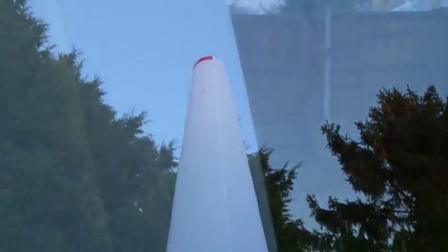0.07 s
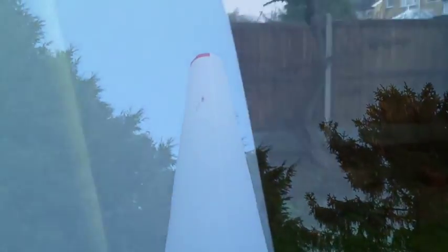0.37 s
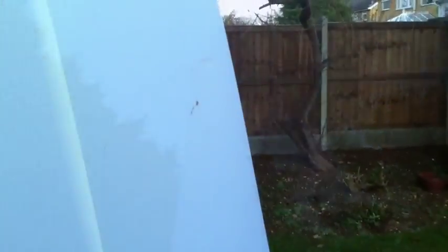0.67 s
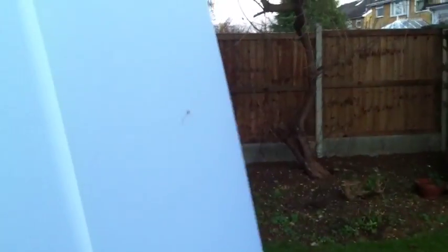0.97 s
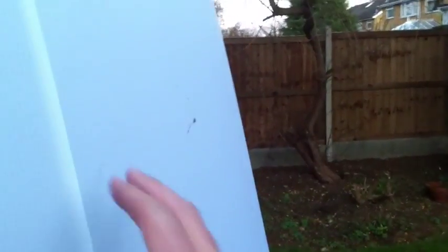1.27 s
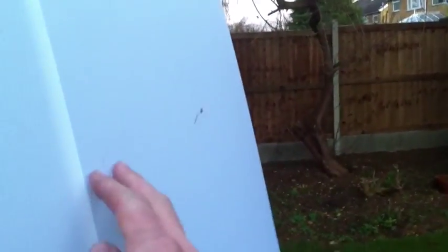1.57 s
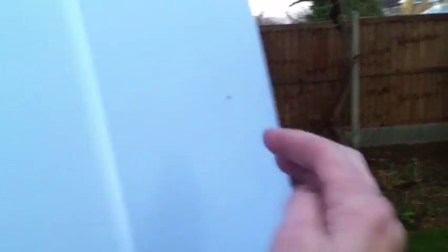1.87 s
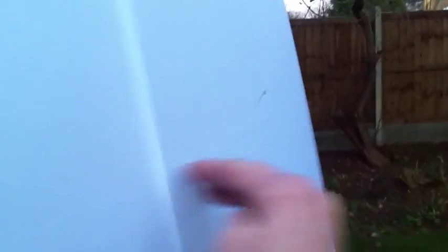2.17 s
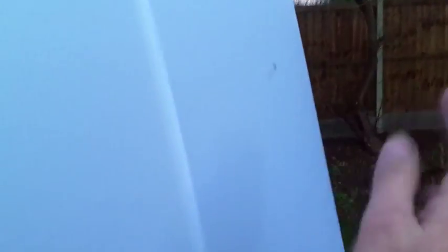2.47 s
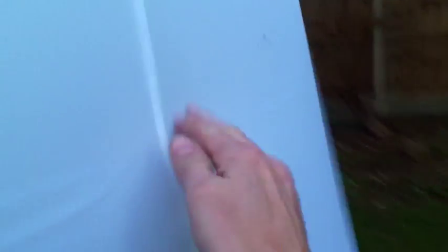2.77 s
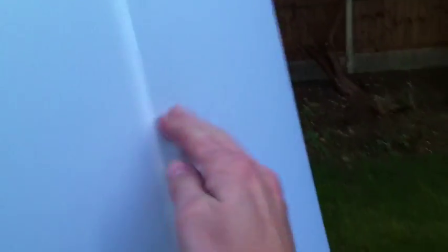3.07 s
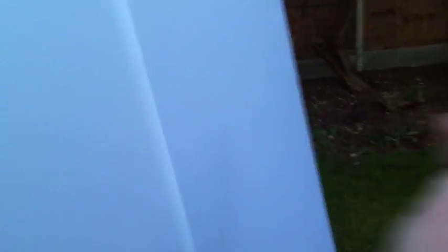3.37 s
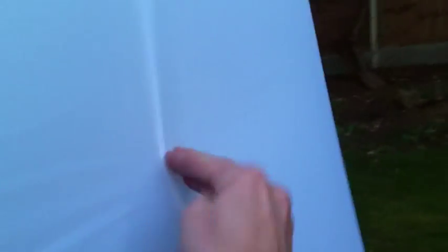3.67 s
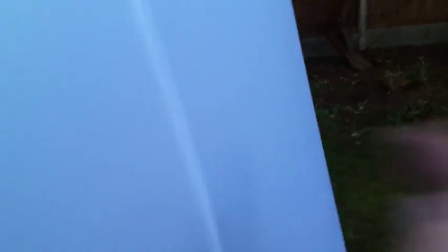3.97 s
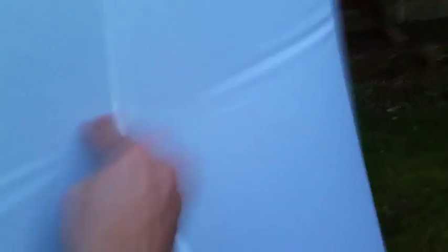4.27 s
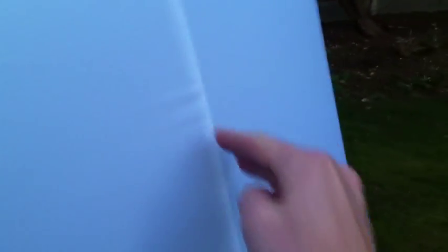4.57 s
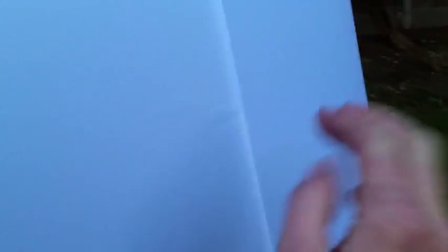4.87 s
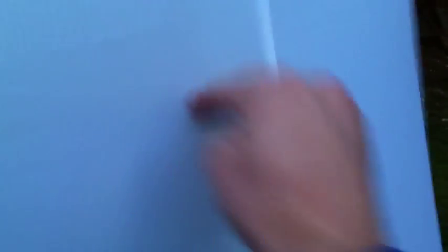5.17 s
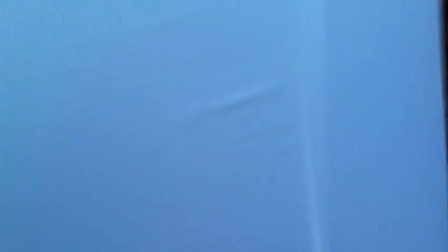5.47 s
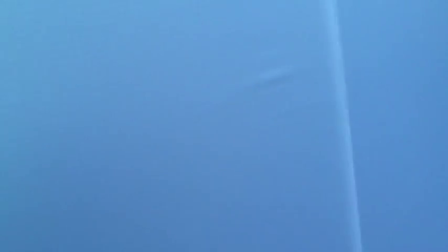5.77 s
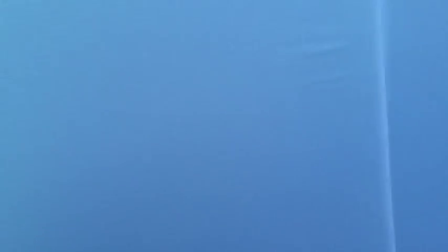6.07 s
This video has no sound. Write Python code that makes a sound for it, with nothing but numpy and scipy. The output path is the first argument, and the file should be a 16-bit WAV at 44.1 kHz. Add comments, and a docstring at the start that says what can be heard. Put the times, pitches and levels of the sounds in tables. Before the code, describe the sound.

An air blower hums quietly and evenly in a garden. After about two seconds, a hand starts slapping the tight fabric of an inflatable close by: five crisp, drum-like thumps at a regular pace, the first a little softer, each with a short reverberation. Brief rubs, tiny finger squeaks and light sleeve rustles fill the gaps. A couple of faint ticks follow the last slap while the blower carries on.

```python
"""A far rush fades in the first half second, leaving the drone of a blower in a fenced garden.
A hand then slaps the taut nylon wall of an inflatable five times, close by. Each slap is a thump of the
air-backed skin, a crack and the ring of air pockets under the hand; the wall wobbles and the garden
reverberates. Between slaps the hand slides, squeaks and peels off, and a sleeve swishes with the arm."""
import sys
import numpy as np
from scipy import signal
from scipy.fft import rfft
from scipy.io import wavfile

SR = 44100
rng = np.random.default_rng(int(sys.argv[2]) if len(sys.argv) > 2 else 0)


def pcm_store(signal):
    """Save signal as 16-bit PCM."""
    levels = np.round(np.clip(np.atleast_2d(signal), -1, 1) * 32767)
    wavfile.write(sys.argv[1], SR, levels.astype(np.int16).T)


N = 278271
TIME = np.arange(N) / SR


def amp(db):
    """Decibels to amplitude ratio."""
    return 10 ** (np.asarray(db) / 20)


def unit(x):
    """Normalisation to rms 1."""
    return x / np.sqrt(np.mean(x ** 2) + 1e-20)


def curve_at(points, hz):
    """Interpolation on a logarithmic frequency axis."""
    point_hz, value = np.transpose(points)
    return np.interp(np.log(hz + 1), np.log(point_hz), value)


def decay(t, t60):
    """Exponential damping: 60 dB in t60 seconds."""
    return np.exp(-np.log(1000) * t / t60)


def ring(t, hz, t60):
    """Free vibration of a damped resonator."""
    return np.sin(2 * np.pi * hz * t) * decay(t, t60)


def add(mix, start_s, sound):
    """Superposition: the sound joins the mix at start_s."""
    part = mix[round(start_s * SR):][:len(sound)]
    part += sound[:len(part)]


def noise(gain, size=N):
    """Spectral shaping: white noise weighted by gain(Hz), at rms 1."""
    spectrum = rfft(rng.standard_normal(size)) * gain(np.fft.rfftfreq(size, 1 / SR))
    return unit(np.fft.irfft(spectrum, size))


def slow_noise(cutoff_hz, size):
    """Low-pass noise with a Gaussian roll-off, at rms 1."""
    return noise(lambda hz: np.exp(-(hz / cutoff_hz) ** 2), size)


def drift(rate_hz):
    """Random modulation of mean 0 and rms 1, mostly slower than rate_hz."""
    return noise(lambda hz: np.exp(-(hz / rate_hz) ** 2) * (hz > 0))


# The spectrum of the far rush. Each row: frequency in Hz, relative level in dB.
RUSH_SPECTRUM = [(100, -17), (300, -28), (480, 0), (640, 5), (820, -3), (1300, -11), (2200, -8.5),
                 (2800, -21), (4000, -12.5), (4700, -31), (10000, -23.5), (16000, -35)]


def far_rush(level_db=-42.5, fade_s=0.43):
    """Broadband noise, perhaps from a road, dies away under a Gaussian envelope."""
    rush = noise(lambda hz: amp(curve_at(RUSH_SPECTRUM, hz)))
    return amp(level_db) * rush * np.exp(-(TIME / fade_s) ** 2)


# The spectrum of the fan's turbulence. Each row: frequency in Hz, relative level in dB.
TURBULENCE_SPECTRUM = [(20, -12), (55, -25), (100, -14), (170, -2), (260, 4), (440, 0), (540, -2),
                       (900, -4.5), (1250, -7), (1650, -13), (2500, -13), (3500, -18.5), (8000, -23),
                       (15500, -36)]
# The resonances of the blower's housing. Each row: centre in Hz, width in Hz, steady rms level in dB.
HOUSING_MODES = [(333.7, 45, -45), (717, 10, -67.5), (1188, 76, -62), (1403, 9.1, -64.5), (2109, 62, -62.5),
                 (4080, 170, -69), (6200, 130, -72.5)]


def blower(roar_db=-46.0, blade_hz=706.6, blade_db=-52.0, waver=0.0017):
    """Turbulence roars, the housing resonates in narrow bands, and blade passage gives a wavering tone."""
    turbulence = noise(lambda hz: amp(curve_at(TURBULENCE_SPECTRUM, hz)))
    roar = amp(roar_db + .5 * drift(7.9)) * turbulence
    drone = sum(amp(db) * noise(lambda hz: 1 / (1 + ((hz - centre) / (0.64 * width)) ** 2))
                for centre, width, db in HOUSING_MODES)
    blade_gain = amp(blade_db + drift(5.9))
    blade_phase = 2 * np.pi * np.cumsum(blade_hz * (1 + waver * drift(9.6))) / SR
    opening_swell = np.interp(TIME, [0, .25], [.5, 1])
    return roar + blade_gain * np.sin(blade_phase) + drone * opening_swell


# The garden's damping. Each row: frequency in Hz, time to decay by 60 dB in seconds.
GARDEN_DECAY = [(100, 1.76), (300, 0.8), (1000, 0.7), (3000, 0.2), (6000, 2), (14000, 4)]
# The colour of its reverberation. Each row: frequency in Hz, relative level in dB.
GARDEN_SPECTRUM = [(80, -8), (200, -15.5), (300, -3), (450, -7), (1000, 0), (2200, -4.5), (3500, -18),
                   (7000, -21), (15000, -16)]


def garden(sound, first_s=.012, fence_s=0.038, fence_db=-21, early_db=6, echoes_per_s=5000):
    """Reflection: early scatter from near walls, a tail from trees and houses, one echo off the fence."""
    t = np.arange(SR // 2) / SR
    scatter = rng.choice([-1., 1.], len(t)) * (rng.random(len(t)) < echoes_per_s / SR)
    hz, frame_s, bands = signal.stft(unit(scatter), SR, nperseg=256)
    t60 = curve_at(GARDEN_DECAY, hz)[:, None]
    colour = amp(curve_at(GARDEN_SPECTRUM, hz))[:, None]
    energy_scale = np.sqrt(2 * np.log(1000) / (t60 * SR))  # longer decays start lower
    bands = bands * decay(frame_s, t60) * colour * energy_scale
    tail = signal.istft(bands, SR, nperseg=256)[1][:len(t)]
    early_boost = amp(early_db * np.exp(-(t / 0.053) ** 2))
    response = tail * (1 - decay(t, 0.0029)) * early_boost
    fence_echo = signal.lfilter(*signal.butter(1, [400, 3000], "band", fs=SR), sound)
    out = np.zeros(N)
    add(out, first_s, signal.fftconvolve(sound, response)[:N])
    add(out, fence_s, amp(fence_db) * fence_echo)
    return out


# The spectrum of rubbing cloth. Each row: frequency in Hz, relative level in dB.
CLOTH_SPECTRUM = [(300, -15), (1500, -4), (4000, -2), (8000, -2.5), (12000, -2), (16000, -9)]
# Arm movements without a blow. Each row: moment of greatest speed in seconds, sleeve level in dB.
ARM_REACHES = [(1.3, -52.5), (3.06, -54), (3.92, -55.5), (5.58, -49.5), (6.02, -55.5)]


def sleeve(rest_db=-62.5, gather_db_per_s=70, settle_db_per_s=34.5, lead_s=0.036):
    """Friction noise of cloth on cloth grows with the arm's speed, which peaks just before each blow."""
    swings = [(start - lead_s, sleeve_db) for start, *_, sleeve_db, _ in BLOWS]
    power = amp(rest_db) ** 2
    for fastest_s, db in swings + ARM_REACHES:
        drop_db = np.maximum(gather_db_per_s * (fastest_s - TIME), settle_db_per_s * (TIME - fastest_s))
        power = power + amp(db - drop_db) ** 2
    cloth = noise(lambda hz: amp(curve_at(CLOTH_SPECTRUM, hz)))
    grain = amp(1.2 * drift(55) + 2.26 * drift(900))
    return cloth * np.sqrt(power) * grain


# Fingers slipping on nylon. Each row: start and length in seconds, first and last pitch in Hz,
# level in dB.
FINGER_SLIPS = [(2.715, 0.0076, 1420, 750, -32), (2.843, 0.019, 1290, 1750, -49),
                (4.338, 0.0078, 1160, 705, -29), (4.491, 0.014, 1446, 710, -37.5),
                (5.317, .022, 3620, 1980, -61), (5.352, .022, 1685, 2140, -43)]


def squeaks(jitter=0.13, overtone_db=-9):
    """Stick-slip oscillation: uneven slips whose rate glides with the finger's speed."""
    out = np.zeros(N)
    for start, length, first_hz, last_hz, db in FINGER_SLIPS:
        glide_hz = np.geomspace(first_hz, last_hz, round(length * SR))
        slip_hz = glide_hz * (1 + jitter * slow_noise(900, len(glide_hz)))
        phase = 2 * np.pi * np.cumsum(slip_hz) / SR
        tone = np.sin(phase) + amp(overtone_db) * np.sin(2 * phase)
        add(out, start, amp(db) * unit(tone * signal.windows.cosine(len(tone))))
    return out


def stroke(length, peak_hz, catch_db=1.3, catch_hz=450, octaves=1.73, swell_share=0.24):
    """Sliding friction: skin catches on threads, and the grainy hiss follows the hand's pressure."""
    size = round(length * SR)
    pressure = np.interp(np.linspace(0, 1, size), [0, swell_share, 1], [0, 1, 0])
    hiss = noise(lambda hz: (1 + (np.log2((hz + 1) / peak_hz) / octaves) ** 2) ** -1.2, size)
    catches = amp(catch_db * slow_noise(catch_hz, size))
    return unit(hiss * catches * pressure)


# Strokes over the weave. Each row: start and length in seconds, level in dB, spectral peak in Hz.
HAND_STROKES = [(2.151, 0.042, -50, 8000), (2.849, 0.046, -36.5, 3740), (2.931, 0.17, -47.5, 8000),
                (3.845, 0.092, -50.5, 8000), (4.348, 0.021, -30, 5100), (4.48, 0.043, -48, 1750),
                (4.511, 0.052, -46, 3250), (4.593, .021, -48.5, 9000), (5.177, 0.097, -44.5, 6030),
                (5.242, 0.029, -37.5, 7400), (5.322, 0.035, -40, 3300), (5.36, .029, -43, 2960)]


def slides(skid_lag_s=.012, skid_s=0.048, hiss_db=-10.5):
    """Friction, dull in grip and bright in glide: the hand skids after each blow and strokes the wall."""
    out = np.zeros(N)
    for start, *_, skid_db in BLOWS:
        rub = stroke(skid_s, peak_hz=980, catch_db=4, catch_hz=220)
        hiss = amp(hiss_db) * stroke(skid_s, peak_hz=6500)
        add(out, start + skid_lag_s, amp(skid_db) * (rub + hiss))
    for start, length, db, peak_hz in HAND_STROKES:
        add(out, start, amp(db) * stroke(length, peak_hz))
    return out


# Fingers landing or letting go, and fabric ticks. Each row: start in seconds, level before filtering
# in dB, pitch in Hz, time to decay by 60 dB in seconds.
LIGHT_CONTACTS = [(1.3342, -30, 2800, .004), (1.4342, -31, 3000, .003), (2.0935, -24, 3500, .004),
                  (2.7178, -21, 1400, .008), (2.854, -23, 1700, .01), (3.5708, -16, 2100, .01),
                  (4.3565, -14, 3000, .005), (4.3575, -17, 380, .02), (4.5225, -26, 1400, .007),
                  (5.5190, -27, 2600, .002), (6.1658, -19.5, 2100, .002)]


def taps(grit_share=0.46, band_hz=(300, 4800), palm_lag_s=0.0051, palm_db=-12.5, palm_hz=1400):
    """Small impacts ring briefly with a little grit, too small to radiate bass and softened by skin."""
    out, t = np.zeros(N), np.arange(SR // 20) / SR
    # the palm lands just behind the fingers, at a level relative to the thump
    palms = [(start + palm_lag_s, thump_db + palm_db, palm_hz, .006) for start, thump_db, *_ in BLOWS]
    for start, db, hz, t60 in palms + LIGHT_CONTACTS:
        grit = noise(lambda f: 1 / (1 + (f / (0.67 * hz)) ** 2), len(t)) * decay(t, 2 * t60)
        add(out, start, amp(db) * (grit_share * grit - ring(t, hz, t60)))
    return signal.sosfilt(signal.butter(3, band_hz, "band", fs=SR, output="sos"), out)


# Waves in the wall. Each row: first pitch in Hz, fall in octaves per second, relative level in dB.
WALL_WAVES = [(228.7, 1.9, 0.5), (247, 7.5, -1.5)]


def wobble(length=0.24, flutter_share=0.37, stagger_rad=1.0, flutter_hz=32, t60=0.65):
    """Membrane waves run round the wall and return staggered, their pitch sinking as the dent relaxes."""
    t = np.arange(round(length * SR)) / SR
    waves = np.zeros(len(t))
    for first_hz, fall, db in WALL_WAVES:
        flutter = 1 + flutter_share * slow_noise(flutter_hz, len(t))
        stagger = stagger_rad * slow_noise(flutter_hz, len(t))
        cycles = rng.uniform(1.0, 1.04) * np.cumsum(first_hz * 2 ** (-fall * t)) / SR
        waves += amp(db) * flutter * np.sin(2 * np.pi * cycles + stagger)
    return unit(waves * np.sin(np.pi * t / length) * decay(t, t60))


def air_pockets(modes, t):
    """Cavity resonance: air rings in the hollows of the hand, neighbours in opposite phase."""
    return -sum((-1) ** k * amp(db) * ring(t, hz, t60) for k, (hz, db, t60) in enumerate(modes))


# The spectrum of escaping air. Each row: frequency in Hz, relative level in dB.
SQUIRT_SPECTRUM = [(200, -78), (600, -39), (1300, -3.5), (2500, -2), (6000, -5.5), (11000, -9),
                   (16000, -12)]


def air_squirt(t, rise_s=0.00072, t60=0.026):
    """Jet noise: a burst of air is squeezed from under the hand."""
    jet = noise(lambda hz: amp(curve_at(SQUIRT_SPECTRUM, hz)), len(t))
    return jet * decay(t, t60) * (1 - decay(t, rise_s))


# The spectrum of the skin's crack. Each row: frequency in Hz, relative level in dB.
CRACK_SPECTRUM = [(40, -25), (200, -17), (600, 0.5), (1300, -4.5), (2200, -22), (4000, 9.5), (7000, -14),
                  (11000, -11), (16000, -4)]


def crack(t, snap_s=.00055, snap_share=0.27):
    """Two minimum-phase impulses: the skin cracks on contact, then snaps tight against the hand."""
    hz = abs(np.fft.fftfreq(len(t), 1 / SR))
    log_gain = np.log(amp(curve_at(CRACK_SPECTRUM, hz)))
    minimum_phase = np.exp(np.conj(signal.hilbert(log_gain)))
    pulse = np.fft.ifft(minimum_phase).real
    contact = pulse / abs(pulse).max()
    snap = np.interp(t - snap_s, t, contact, left=0)
    return snap_share * snap - contact


def thump(t, hz, rise_s=0.0025, t60=.027):
    """Radiation follows the rate of change of the air moved: the dent first sucks, then rebounds."""
    moved_air = ring(t, hz, t60) * (1 - decay(t, rise_s))
    return -np.gradient(moved_air) * SR / (2 * np.pi * hz)


# The blows of the hand; the first two merge into one slap. Each row: start in seconds, thump level in dB,
# thump pitch in Hz, then levels in dB of crack, air squirt, garden send, wobble, sleeve and skid.
BLOWS = [(2.0622, -14, 157, -28, -21, -7, -52, -64, -61), (2.0685, -19, 174, -12, -31, 0, -53, -50.5, -52),
         (2.6874, -5.5, 180, -6, -12.5, -6, -41.5, -49.5, -35),
         (3.5517, -4.5, 199, -5.5, -14.5, -3, -40, -53, -38),
         (4.3128, -5, 218, -13, -14, -3, -42, -48.5, -31.5),
         (5.0902, -5.5, 162, -6.5, -20, -2.5, -43, -46, -36)]
# The air pockets under the hand. Each row: one blow's modes, each with pitch in Hz, level in dB,
# time to decay by 60 dB in seconds.
POCKET_MODES = [
    [(704, -22, 0.016), (1150, -19.5, 0.011), (4030, -20, 0.021)],
    [(950, -28, 0.0093), (3940, -37, 0.0046)],
    [(747, -6, 0.014), (1200, 0, 0.0053), (3570, -12.5, 0.011), (6030, -18, 0.012)],
    [(924, -14, 0.022), (1380, -6.5, 0.012), (3700, -14, 0.0058), (6060, -10, 0.0055)],
    [(1600, -11.5, 0.0082), (2330, -3.5, 0.0059), (3280, -1.5, 0.011), (3830, -7, 0.0055)],
    [(1070, -13.5, .007), (2050, -14.5, 0.011), (3080, -3.5, 0.0027), (4130, -11, 0.0031)],
]


def slaps(pocket_share=0.24):
    """Impact on an air-backed membrane: returns the direct sound and the part sent into the garden."""
    direct, sent = np.zeros(N), np.zeros(N)
    t = np.arange(2048) / SR
    for blow, modes in zip(BLOWS, POCKET_MODES):
        start, thump_db, thump_hz, crack_db, squirt_db, send_db, wobble_db, _, _ = blow
        hit = amp(thump_db) * thump(t, thump_hz) + amp(crack_db) * crack(t)
        hit += amp(squirt_db) * air_squirt(t)
        pockets = air_pockets(modes, t)
        add(direct, start, hit + pockets)
        add(direct, start, amp(wobble_db) * wobble())
        add(sent, start, amp(send_db) * (hit + pocket_share * pockets))  # the hand shields its hollows
    return direct, sent


def scene(touch_send_db=-18.0):
    """Superposition of the hand's direct sound, the garden's reflections and the background, in mono."""
    direct, sent = slaps()
    touches = taps() + slides() + squeaks()
    reflections = garden(sent + amp(touch_send_db) * touches)
    return (direct + touches + reflections + sleeve() + blower() + far_rush())[None]


def record(dry, low_cut_hz=55, band_limit_hz=16050):
    """Clipping at full scale, then band limiting: the microphone's low cut and a steep low-pass."""
    thinned = signal.lfilter(*signal.butter(1, low_cut_hz, "high", fs=SR), np.clip(dry, -1, 1))
    low_pass = signal.firwin(301, band_limit_hz, window=("kaiser", 8), fs=SR)
    return signal.oaconvolve(thinned, low_pass[None], "same")


dry = scene()
out = record(dry)
pcm_store(out)
```